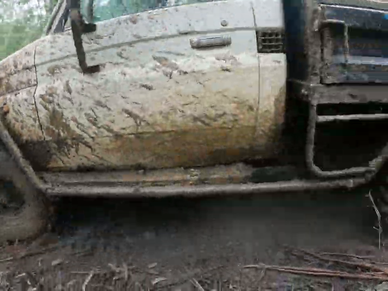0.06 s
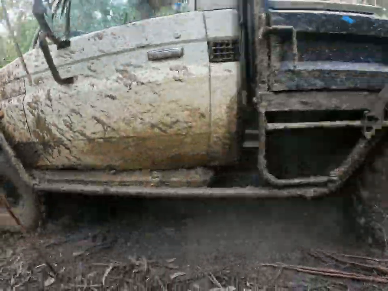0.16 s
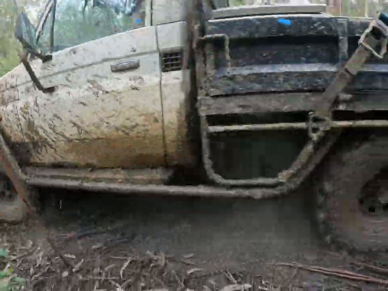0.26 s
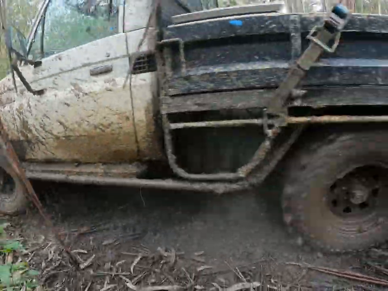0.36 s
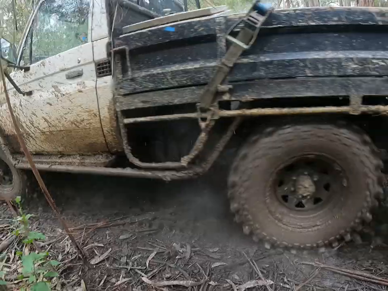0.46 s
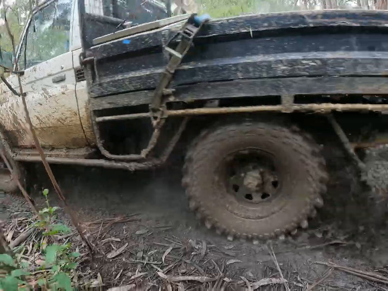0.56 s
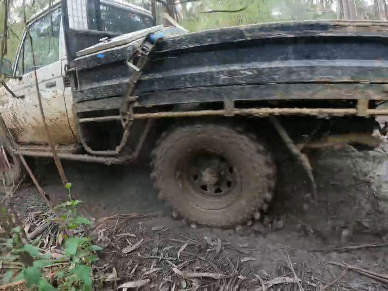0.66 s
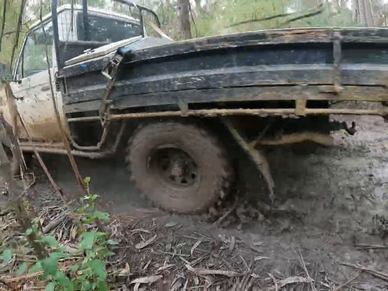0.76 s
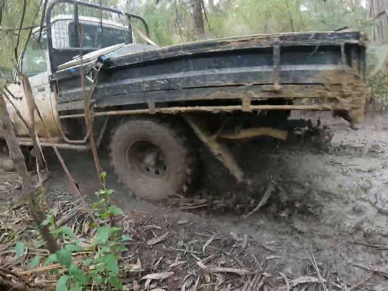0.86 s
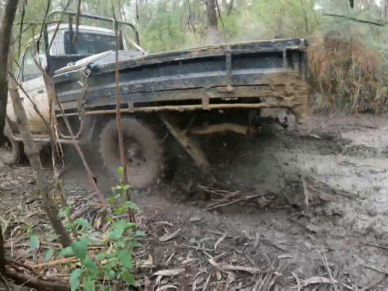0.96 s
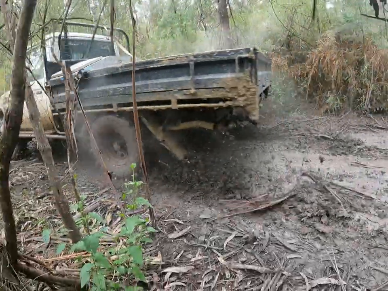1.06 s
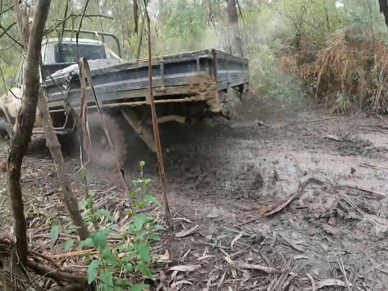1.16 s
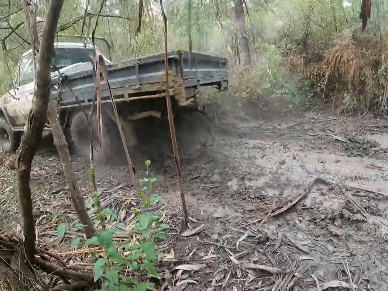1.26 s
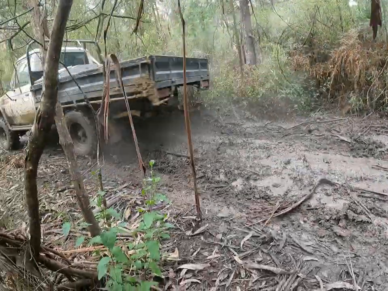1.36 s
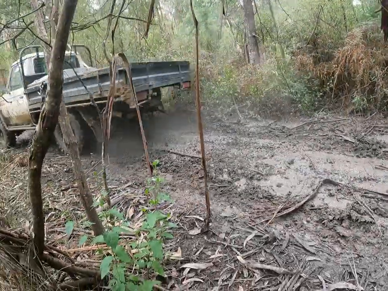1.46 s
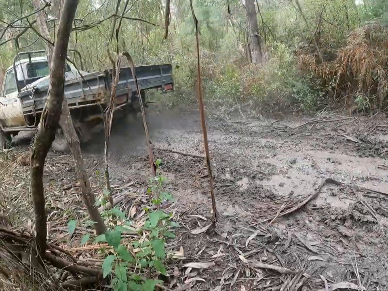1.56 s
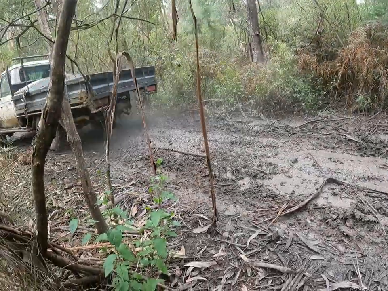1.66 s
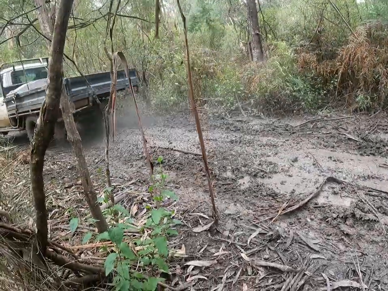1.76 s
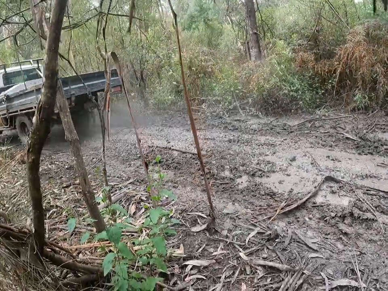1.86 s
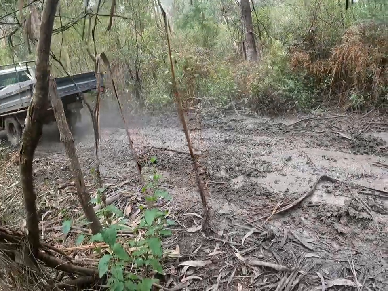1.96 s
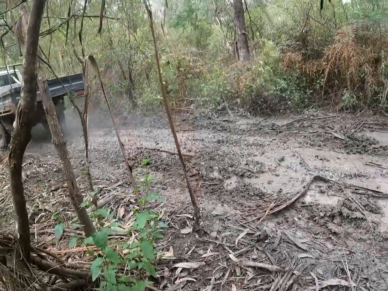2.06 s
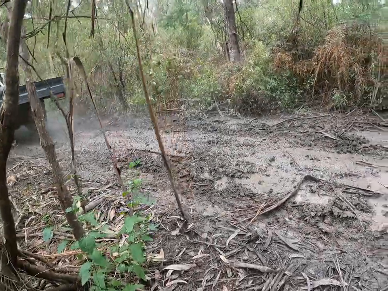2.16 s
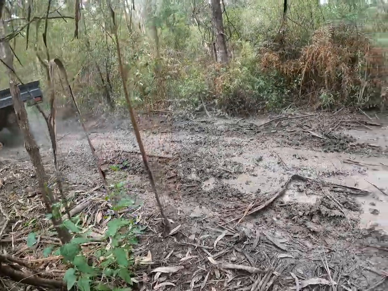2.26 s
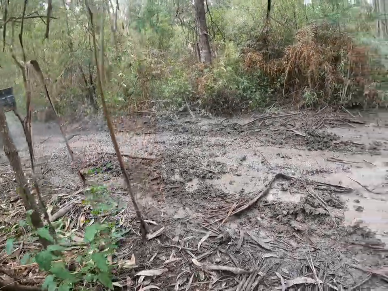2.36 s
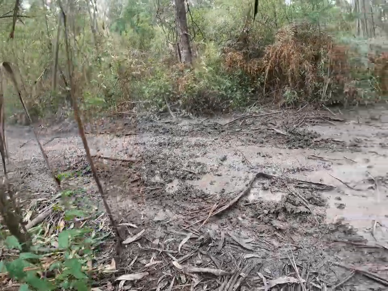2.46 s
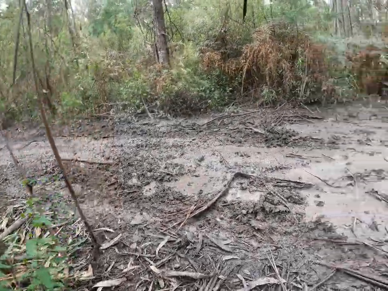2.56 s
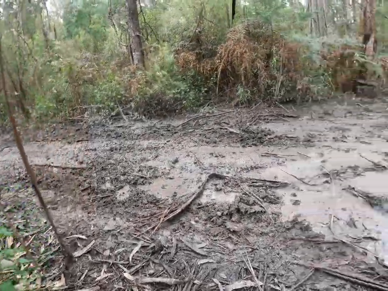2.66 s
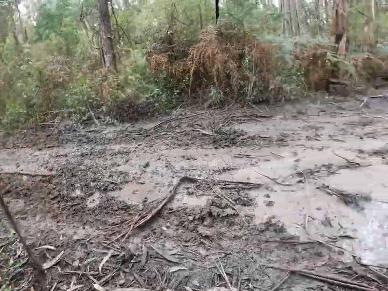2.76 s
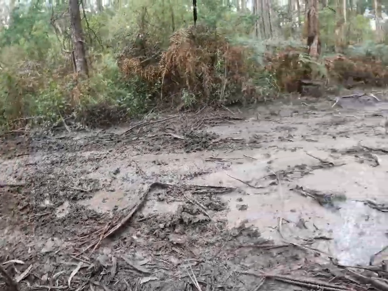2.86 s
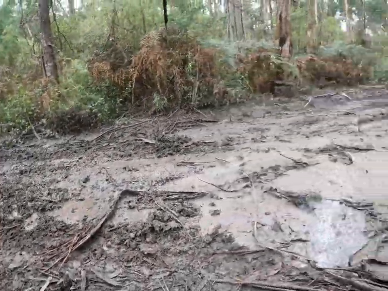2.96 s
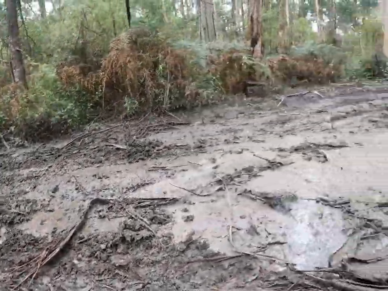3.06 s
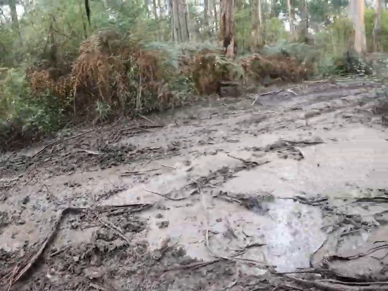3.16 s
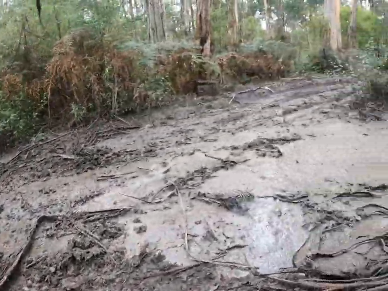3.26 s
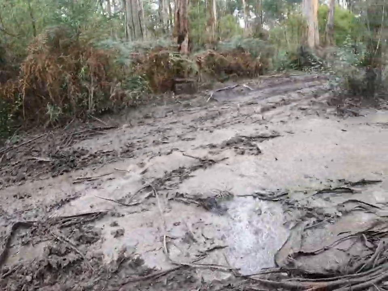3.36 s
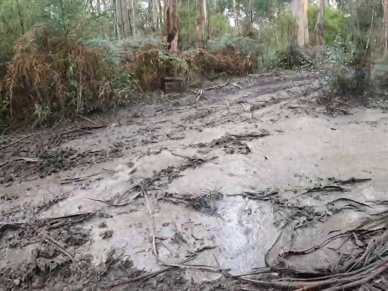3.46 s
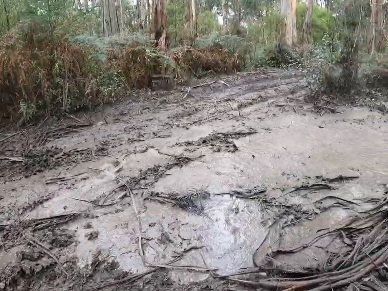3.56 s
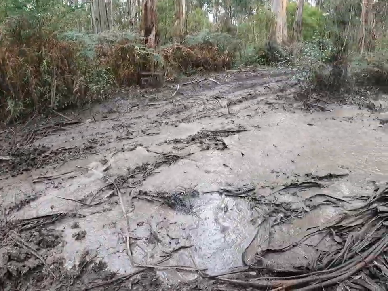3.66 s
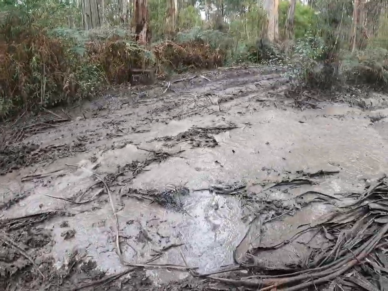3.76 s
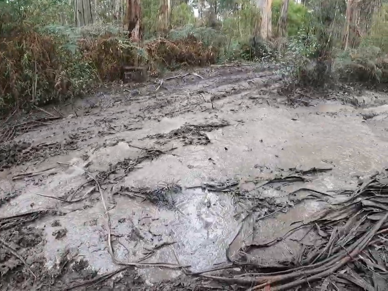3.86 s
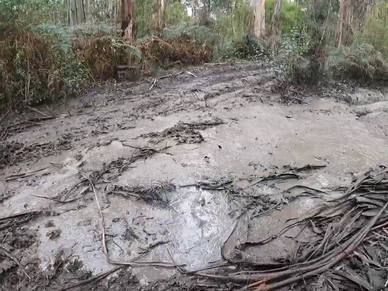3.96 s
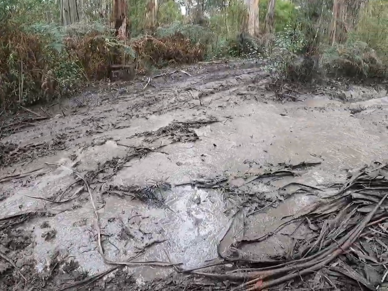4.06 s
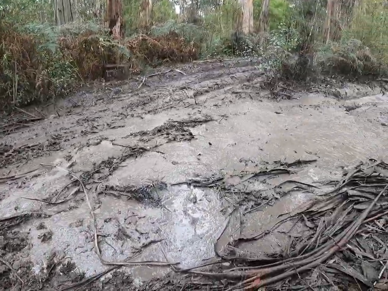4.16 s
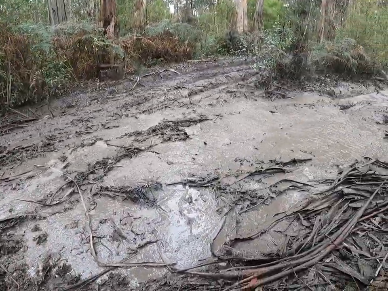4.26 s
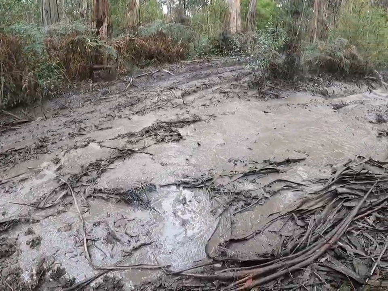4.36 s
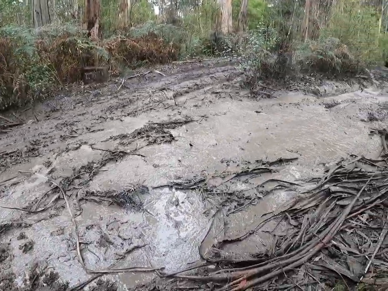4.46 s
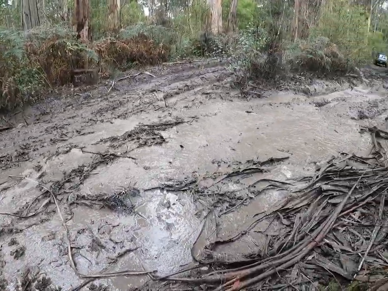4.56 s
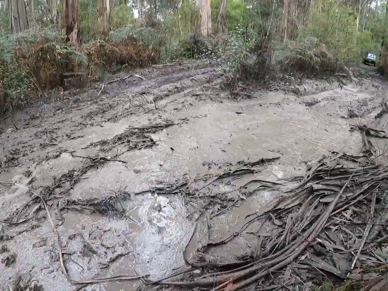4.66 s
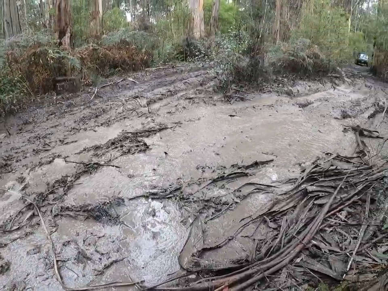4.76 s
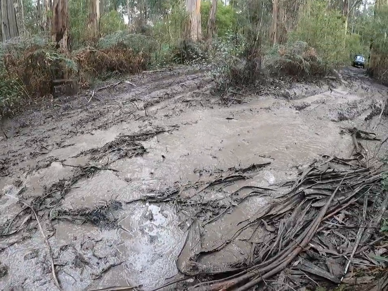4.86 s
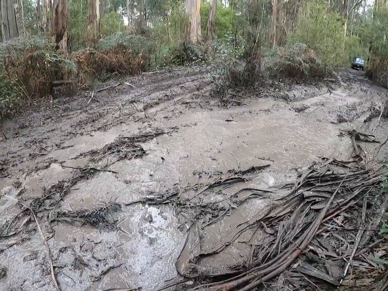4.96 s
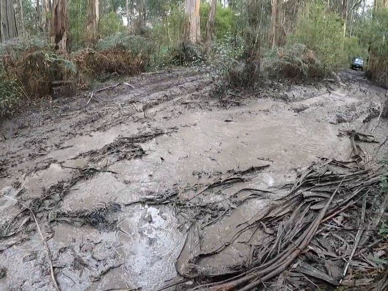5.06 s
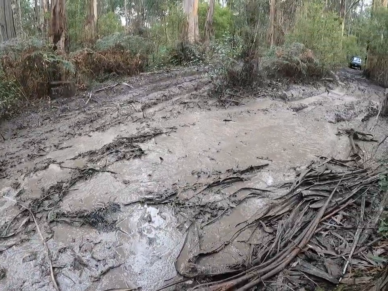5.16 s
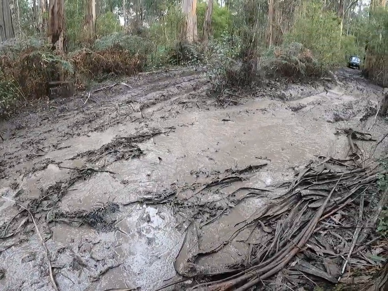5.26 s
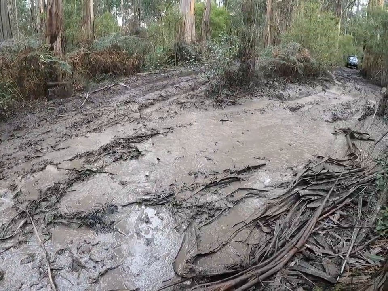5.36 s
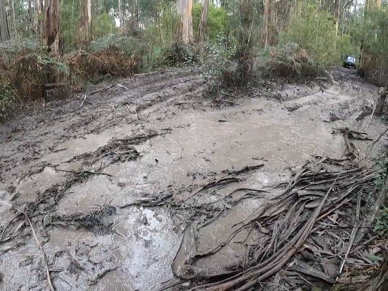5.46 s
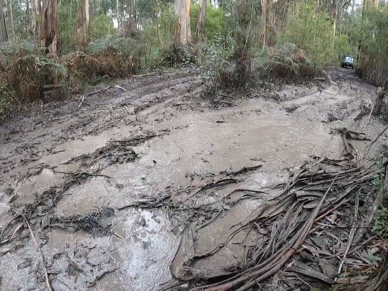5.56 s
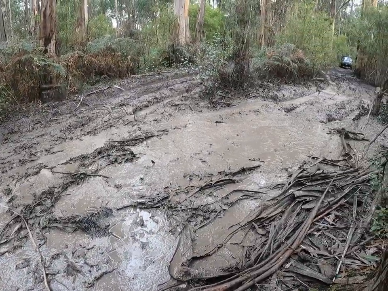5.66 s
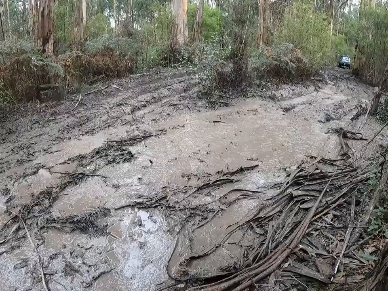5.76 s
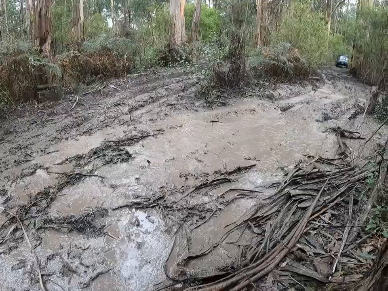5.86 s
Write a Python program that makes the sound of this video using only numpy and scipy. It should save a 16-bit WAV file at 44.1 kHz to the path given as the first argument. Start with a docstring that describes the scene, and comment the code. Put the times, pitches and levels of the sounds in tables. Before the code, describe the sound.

Close diesel engine roar and wet mud spray pass by, then barking throttle stabs recede, leaving twig ticks, rustling and a distant engine.

```python
"""On a muddy forest track, a six-cylinder diesel truck claws past close by and drives off, revving in bursts.
Its exhaust is built from wavering sines; its bark and clatter are firings sent through resonances.
Mud, spray and late rustling are patchy noise; knocks and nearby twig ticks are short dying bursts of noise.
The truck ticks over among echoing trees, while a distant second engine, also sines, slows and pulls away."""
import sys
import numpy as np
from scipy import signal
from scipy.fft import rfft, irfft, next_fast_len
from scipy.io import wavfile
from scipy.ndimage import uniform_filter1d, map_coordinates

SR = 44100
rng = np.random.default_rng(int(sys.argv[2]) if len(sys.argv) > 2 else 0)


def boost_factor(decibels):
    """Convert a level in decibels to a linear amplitude factor."""
    exponent = np.asarray(decibels, float) / 20
    return 10 ** exponent


def file_out(sig):
    """Save sig as 16-bit WAV at sys.argv[1]."""
    # one column per channel
    cols = np.atleast_2d(sig).T
    # limit, then scale
    lim = np.clip(cols, -1, 1)
    pcm = np.round(lim * 32767).astype(np.int16)
    wavfile.write(sys.argv[1], SR, pcm)


N = 259749

# Truck exhaust. Each row: time in seconds, half the firing rate in Hz, firing tone in dB.
TRUCK_EXHAUST = [(0.0, 81.13, -22.5), (0.17, 75.44, -20.5), (0.42, 71.3, -18), (0.6, 66.6, -11.5),
                 (0.84, 74.85, -12), (1.02, 77.14, -12), (1.15, 78.86, -15), (1.2, 75.85, -13.5),
                 (1.31, 69.43, -14.5), (1.55, 60.57, -12.5), (1.64, 56.71, -22.5), (1.74, 52.28, -29),
                 (1.83, 49.7, -31.5), (1.87, 52.94, -20.5), (1.97, 60.6, -15), (2.03, 63.2, -18),
                 (2.17, 59.1, -19.5), (2.28, 65.2, -20), (2.31, 65.9, -29), (2.39, 64.11, -13.5),
                 (2.52, 62.5, -17.5), (2.74, 64.2, -17.5), (2.85, 62.87, -16.5), (3.12, 70.5, -22.5),
                 (3.29, 73.33, -21), (3.39, 70.8, -25), (3.46, 66.27, -12), (3.65, 57.97, -21),
                 (3.8, 53.37, -26), (3.97, 45.94, -40.5), (4.1, 43.64, -51)]
# Tailpipe colour of the burble. Each row: frequency in Hz, relative level in dB.
PIPE_COLOUR = [(20, -29), (60, -25), (130, 5), (180, -16.5), (270, 2.5), (340, -17.5), (700, -23.5),
               (1200, -66)]
# Base noise levels; after about 4 s the last two are rustling near the microphone.
# Each row: time in seconds, engine noise in dB, mud rush in dB, spray in dB.
NOISE_LEVELS = [(0.0, -27.5, -28.5, -36.5), (0.35, -25, -27.5, -38.5), (0.7, -27.5, -29.5, -37),
                (1.0, -30.5, -34, -45), (1.2, -32.5, -37.5, -47.5), (1.42, -33.5, -39, -53.5),
                (1.6, -41, -43.5, -51), (1.85, -47.5, -45, -52.5), (2.1, -42, -44, -56),
                (2.4, -46.5, -46, -57), (2.65, -48.5, -48, -56.5), (2.9, -51, -53, -52.5),
                (3.35, -50.5, -52, -58.5), (3.6, -46.5, -55.5, -72), (4.1, -51, -60.5, -70),
                (4.4, -52.5, -63, -63.5), (4.78, -62, -57.5, -60.5), (5.05, -65.5, -55, -60.5),
                (5.5, -55, -53.5, -60.5), (5.89, -53.5, -53.5, -68)]
# Engine block resonances. Each row: centre in Hz, width in Hz, level in dB before the filter is squared.
BLOCK_MODES = [(1555, 152, 1), (1753, 93, 0), (2330, 810, -9.5)]
# Noise colours: mud, spray, truck body, rumbling ground, forest air. Each row: frequency in Hz,
# relative level in dB per Hz.
MUD_COLOUR = [(1120, -18), (1900, 6), (2140, 1.5), (2560, 4.5), (3730, -1), (4180, -3), (6500, -10),
              (8450, -19), (14300, -120)]
SPRAY_COLOUR = [(3500, -22), (5000, 5), (6300, -2), (7800, -0.5), (9500, -6), (10200, -13.5),
                (13000, -13.5), (15000, -41.5), (16000, -54.5)]
BODY_COLOUR = [(250, -17), (350, -25.5), (450, 4), (550, 3.5), (680, 4.5), (800, 0.5), (950, -6),
               (1400, -40)]
GROUND_COLOUR = [(20, 13), (50, 26.5), (130, 30.5), (180, 3.5), (250, -19), (380, 17), (500, -37)]
AIR_COLOUR = [(100, -23.5), (170, 1), (368, 2.5), (687, -14.5), (741, -15.5), (964, -7), (1830, -13.5),
              (2300, -17.5), (4280, -23), (8440, -36), (15400, -64)]
# Distant engine. Each row: time in seconds, half the firing rate in Hz, tone at that rate in dB,
# firing tone in dB.
FAR_ENGINE = [(3.9, 73.6, -40.5, -49), (4.08, 67.5, -40, -30), (4.16, 68.5, -48, -50),
              (4.25, 74.3, -38, -42), (4.364, 69.97, -48, -34), (4.47, 66, -51, -30),
              (4.614, 55.16, -45, -38.5), (4.8, 63.6, -44, -43), (4.914, 64.4, -41, -38),
              (5.064, 65.1, -48, -49), (5.2, 57.04, -43, -40.5), (5.41, 52.6, -49, -45.5),
              (5.468, 41.96, -32, -31), (5.49, 44.1, -21.5, -27), (5.57, 55.4, -24.5, -23),
              (5.63, 62.76, -23, -24), (5.89, 64.5, -22.5, -23.5)]
# Its weaker tones. Each row: multiple of half the firing rate, level against the firing tone in dB.
FAR_WEAK_TONES = [(.5, -16), (1.5, -7), (2.5, -15), (4, -19), (5.5, -25), (7.5, -28)]
# Its third tone, by that tone's pitch. Each row: pitch in Hz, level over the firing tone in dB.
FAR_THIRD_TONE = [(120, -13), (145, 4), (170, -21), (200, -27)]
# Twig ticks near the microphone. Each row: start in seconds, bright peak in dB, centre in Hz,
# dull peak in dB, time to fall 60 dB in seconds.
TWIG_TICKS = [(2.80, -31.5, 8400, -47, 0.008), (3.071, -32, 4800, -50, .01),
              (3.107, -32, 7460, -47, 0.0075), (3.1765, -21, 4192, -33.5, 0.0071),
              (3.2295, -28.5, 6000, -55, 0.015), (3.254, -26, 6130, -53, .01),
              (3.262, -20, 5360, -27.5, 0.013), (3.3325, -23.5, 6936, -33, 0.011),
              (3.348, -31, 6500, -50, .014), (3.472, -36.5, 6500, -34, .009), (3.51, -35, 4998, -43, .01),
              (4.04, -42, 2990, -35, 0.045), (4.3642, -15.5, 4360, -26, .012),
              (4.747, -39, 6200, -52, 0.034), (4.9, -46, 2500, -37.5, .04), (5.007, -40, 6002, -49, .03),
              (5.208, -34.5, 2800, -32.5, 0.077), (5.2762, -29, 3140, -49, 0.0052),
              (5.314, -28, 4180, -28.5, 0.0071), (5.6, -38.5, 7000, -56, .01),
              (5.63, -39, 7000, -53, 0.012)]
# How alike the two sides are. Each row: frequency in Hz, likeness from 0 to 1.
LIKENESS = [(60, .999), (250, .99), (600, .95), (2000, .92), (5000, .92), (8000, .72), (11000, .2)]
# Balance of the two ports. Each row: frequency in Hz, left over right in dB.
BALANCE = [(60, .8), (150, 0.31), (400, 0.1), (5000, 0.1), (8000, 0.48), (12000, 1.8)]
# Timing of the two ports. Each row: frequency in Hz, lead of the left in radians.
LEFT_LEAD = [(60, -.03), (120, -.12), (230, -.3), (500, -.45), (750, -.55), (1050, -.45), (1500, -.18),
             (3000, -.15), (10000, -.05)]
# Direction above the bass as the truck leaves. Each row: time in seconds, left over right in dB,
# extra echo share from 0 to 1.
DIRECTION = [(0.0, -0.4, 0), (1.26, -1.5, 0), (2.12, 2.5, 0), (3.74, 8, 0.32), (4.76, 1.5, 0.37),
             (5.89, 6.5, 0.39)]
# Echo among the trees. Each row: frequency in Hz, time to fall 60 dB in seconds.
TREE_ECHO = [(100, 1), (1000, 1), (8000, 0.89)]
# Truck ticking over among the trees. Each row: time in seconds, half the firing rate in Hz, tone level in dB.
IDLING = [(4.1, 42.6, -46), (4.32, 37.16, -46), (4.6, 36.74, -59), (4.78, 37.25, -59), (5.08, 36.3, -35),
          (5.42, 35.4, -54)]
# Upper exhaust tones. Each row: frequency in Hz, level over the body noise in dB, before BOOM_AND_GROWL.
GROWL_COLOUR = [(330, -16), (450, -19), (540, -12), (650, -8), (750, -12), (850, -14.5), (1000, -11.5),
                (1300, -16)]
# Driveline whine. Each row: time in seconds, pitch in Hz, level in dB.
DRIVELINE = [(0.0, 296.2, -17.5), (0.2, 304.4, -25), (0.37, 296, -32), (0.5, 310, -28)]
# The bark's resonance, sliding with load and angle. Each row: time in seconds, centre in Hz.
BARK_SLIDE = [(0.25, 1020), (0.44, 1237), (1.11, 1132), (1.25, 974), (1.9, 996.8), (2.5, 1060),
              (3.03, 1260), (3.3, 1084), (4.1, 1190)]
# Separate knocks: one while alongside, the others as the throttle is pressed. Each row: start in seconds,
# bright peak in dB, centre in Hz, dull peak in dB.
SINGLE_KNOCKS = [(.758, -13, 3221, -17.5), (1.881, -40, 2604, -41), (2.194, -32, 2443, -27.5),
                 (2.4446, -32, 3430, -16.5)]
# Firings: blurred alongside, crispest in the short revs, softer again afterwards. Each row: time in seconds,
# strength of blow over noise.
CRISPNESS = [(0, .25), (.75, .3), (.9, .6), (1.4, .7), (1.8, 1.2), (2.4, 1.2), (2.6, .6), (5.89, .4)]
# The driver's foot. Each row: press in seconds, lift in seconds, how far from 0 to 1.
FOOT = [(-0.1, 1.42, 0.25), (1.869, 1.985, 0.95), (2.183, 2.29, 0.67), (2.337, 2.38, 0.49),
        (2.438, 3.39, 0.76)]
# Intake hiss under a held throttle. Each row: time in seconds, centre in Hz, level over the mud rush in dB.
INTAKE_HISS = [(0.0, 3300, -26), (0.45, 3320, -18), (1.1, 3340, -3), (1.76, 3250, -3), (2.4, 3340, -4),
               (2.67, 3700, 1), (2.95, 3700, -5.5), (3.9, 3300, -10.5), (4.2, 3300, -16)]
# Boom and upper exhaust changes over time; low noise swells again late on. Each row: time in seconds,
# boom change in dB, upper exhaust change in dB.
BOOM_AND_GROWL = [(0.0, -2.5, -2.5), (0.75, -2.5, -0.5), (0.9, 2.5, 7), (1.15, 2.5, 0), (1.3, 0.5, 1.5),
                  (1.55, -2, 3), (1.9, -3.5, 2), (2.4, -1, 2), (2.65, 1, 8), (2.9, 1.5, 8.5), (3.3, 0.5, 5),
                  (3.5, -0.5, -4), (4.4, -4, -3), (4.9, 3.5, -5), (5.89, 5, -6)]

PRESS_S, LIFT_S, SURGE, SURGE_S = 0.012, 0.038, 0.21, 0.058  # ramps; extra push at the press, its fading time
BEHIND_S, TURN_S = 2.1, 0.3  # the tailpipe has swung round to face the microphone, over this long
LEAVES_S, LEAVES_DB_PER_S = 3.29, -14  # from here most exhaust tones fade with distance
# Each tone: coasting dB, dB per Hz of half rate over 65 Hz, dB gained at throttle 1 alongside, and from behind.
HALF_TONE, THIRD_TONE = (-28.5, 0.6362, -9, -5), (-43.5, 0.12, -18, 10)
FOURTH_TONE, BURBLE = (-34.5, 0, 7, 14), (-35.5, 0.31, -19.5, -8.5)
# Each noise: dB over its base level, dB gained at throttle 1.
BARK, CLATTER, RUSH, BOOM = (0.18, 16.8), (-7.5, 10.8), (0.16, 8), (-4, 10.4)
BOOM_HZ, ODD_BEHIND_DB = 694, -6.5  # odd upper tones fade from behind the tailpipe
LOPE_HZ, LOPE_PER_HZ, LOPE_MOST = 62, 0.12, 0.85  # half rate where loping starts; depth per Hz below; limit
# One cylinder knocks once a cycle as the engine bogs down, another more weakly two firings before it.
BOG_S, BOG_DB, BOG_HZ, BOG_DULL_DB, WEAKER_DB = 1.2265, -13, 3300, -14.5, -9
BOG_FADES_DB, LIFTED_DB = -0.11, -10  # fading per turn of the half rate; drop once the foot lifts
KNOCK_T60_S, KNOCK_PAN_DB = 0.026, 1.5
FAR_HISS_HZ, FAR_HISS_DB = 3350, -28.5  # level over its half-rate tone
RUMBLE_DB, RUMBLE_FOLLOWS = -35.5, 0.075  # lowest level; share of the distant engine's swell in dB
FAINT_T60_S, FAINT_DB, FAINT_HZ, TICK_PAN_DB = 0.011, -44, 6500, 4  # faint twigs: typical level, pitch scale
AIR_DB, AIR_FILLED_DB = -45, -0.9  # still forest; what is added, over the base mud rush
LEFT_RIGHT = np.array([[0.5], [-0.5]])


def unit(x):
    """Scaled to rms 1."""
    return x / np.sqrt(np.mean(x ** 2) + 1e-20)


def along(points, hz):
    """Reads a table of frequencies and values along a log frequency axis."""
    f, v = np.transpose(points)
    return np.interp(np.log(hz + 1), np.log(f + 1), v)


def curves(rows):
    """One value per sample for each column after the time."""
    s, *cols = np.transpose(rows)
    return [np.interp(np.arange(N) / SR, s, c) for c in cols]


def between(rows):
    """1 while a table lasts, with short fades just outside it."""
    t = np.arange(N) / SR
    return np.clip(np.minimum(t - rows[0][0], rows[-1][0] - t) / 0.089 + 1, 0, 1)


def wobble(rate):
    """A smooth random curve through so many random points a second."""
    return map_coordinates(rng.standard_normal(int(N * rate / SR) + 4), [np.arange(N) * rate / SR])


def filtered(x, response, size=0):
    """Shapes x by a response to frequency; size mirrored samples keep the ends smooth."""
    wide = np.pad(x, [(0, 0)] * (x.ndim - 1) + [(size, size)], "reflect")
    m = next_fast_len(wide.shape[-1] + 8192)
    return irfft(rfft(wide, m) * response(np.fft.rfftfreq(m, 1 / SR)), m)[..., size:size + x.shape[-1]]


def ringing(modes):
    """Response of parts that ring after a push: centre in Hz, width in Hz, level in dB."""
    return lambda f: sum((-1) ** k * boost_factor(db) * 1j * f * w / (c * c - f * f + 1j * f * w)
                         for k, (c, w, db) in enumerate(modes))


def resonated(x, modes):
    """Sends x through the same resonances twice, for steeper sides."""
    return filtered(x, lambda f: ringing(modes)(f) ** 2)


def sliding(x, hz, width_hz):
    """A moving resonance: fixed ones, close together, cross-faded along hz."""
    step = width_hz / 4
    share = lambda c: np.clip(1 - abs(hz - c) / step, 0, 1)
    centres = np.arange(hz.min(), hz.max() + step, step)
    return unit(sum(share(c) * resonated(x, [(c, width_hz, 0)]) for c in centres))


def rush(spectrum, patchy_db):
    """Coloured noise of rms 1 with random louder and softer patches in time and pitch."""
    z = signal.stft(rng.standard_normal(N), nperseg=512)[2]
    field = uniform_filter1d(uniform_filter1d(rng.standard_normal(z.shape), size=5, axis=0), size=8, axis=1)
    x = signal.istft(z * boost_factor(patchy_db * unit(field)), nperseg=512)[1][:N]
    return unit(filtered(x, lambda hz: boost_factor(along(spectrum, hz))))


def tone(turns, db, waver_db):
    """A sine whose strength wavers around rms level db."""
    return np.sqrt(2) * boost_factor(db + waver_db * wobble(18)) * np.sin(2 * np.pi * (turns + rng.random()))


def snaps(rows, pan_db):
    """Each is a sharp dying burst of noise in one broad band, with a dull part near 1 kHz."""
    out, t = np.zeros((2, N + SR)), np.arange(SR // 16) / SR
    peak = lambda x: x / abs(x).max()
    for s, db, hz, dull_db, t60 in rows:
        burst = boost_factor(-60 * t / max(t60, 0.003)) * rng.standard_normal((2, len(t)))
        band = ringing([(hz, 1.7 * hz, 0)])
        bright = filtered(burst[0], lambda f: band(f) ** 2 / (1 + (f / (1.28 * hz)) ** 4))
        dull = resonated(burst[1], [(1100, 800, 0)])
        sound = boost_factor(db) * peak(bright) + boost_factor(dull_db) * peak(dull)
        start = round(s * SR)
        out[:, start:start + len(t)] += sound * boost_factor(pan_db * LEFT_RIGHT)
    return out[:, :N]


def truck():
    """Shares one engine speed and one throttle among the exhaust, firing noise, body, mud and spray."""
    half_hz = curves(TRUCK_EXHAUST)[0]
    engine_db, mud_db, spray_db = curves(NOISE_LEVELS)
    foot = throttle()
    behind = curves([(BEHIND_S - TURN_S, 0), (BEHIND_S, 1)])[0]
    boom_db, growl_db = curves(BOOM_AND_GROWL)
    body_db = engine_db + BOOM[0] + foot * BOOM[1] + boom_db
    mud_db = mud_db + RUSH[0] + foot * RUSH[1]
    turns = np.cumsum(half_hz) / SR
    # each firing is one blow and a short burst of noise, of its own size
    firing = 2 * turns
    size = boost_factor(0.43 * rng.standard_normal(1200))[firing.astype(int)]
    strikes = np.diff(np.floor(firing), prepend=0) > 0
    blows = unit(size * strikes * between(TRUCK_EXHAUST))
    beat = size * np.exp(-4 * (firing % 1))
    tones = exhaust(turns, half_hz, foot, behind) + growl(turns, half_hz, body_db + growl_db, behind)
    noises = bark_and_clatter(blows, beat, engine_db, foot) + mud_and_spray(beat, mud_db, spray_db)
    return between(TRUCK_EXHAUST) * tones + noises + intake(mud_db) + body(blows, body_db)


def throttle():
    """How far the foot is down: each press ramps in, surges briefly, holds and ramps out."""
    t = np.arange(N) / SR
    ramp = lambda on, off: np.clip(np.minimum((t - on) / PRESS_S, (off - t) / LIFT_S + 1), 0, 1)
    surge = lambda on: 1 + SURGE * np.exp(-abs(t - on) / SURGE_S)
    return sum(far * ramp(on, off) * surge(on) for on, off, far in FOOT)


def exhaust(turns, half_hz, foot, behind):
    """Exhaust pulses make tones at multiples of half the firing rate; unequal cylinders add a burble."""
    firing_db = curves(TRUCK_EXHAUST)[1]
    gone_db = LEAVES_DB_PER_S * np.clip(np.arange(N) / SR - LEAVES_S, 0, None)

    def level(db, per_hz, side, rear):
        pressed_db = foot * (side + (rear - side) * behind)
        return db + gone_db + per_hz * (half_hz - 65) + pressed_db

    # when slow and coasting, the firing tone lopes once a cycle
    depth = np.clip(LOPE_PER_HZ * (LOPE_HZ - half_hz) * (1 - 2 * foot), 0, LOPE_MOST)
    lope = 1 + depth * np.sin(2 * np.pi * turns / 3)
    hum = lope * tone(2 * turns, firing_db, waver_db=1.14)
    hum += tone(turns, level(*HALF_TONE), waver_db=5.0)
    hum += tone(3 * turns, level(*THIRD_TONE), waver_db=1.8)
    hum += tone(4 * turns, level(*FOURTH_TONE), waver_db=1.8)
    # the burble sits on multiples of the whole engine cycle, a third of the half rate
    burble_db = level(*BURBLE)
    burble = sum(tone(k * turns / 3, burble_db + along(PIPE_COLOUR, k * half_hz / 3), waver_db=2.5)
                 for k in range(1, 20) if k % 3)
    return hum + burble


def growl(turns, half_hz, db, behind):
    """Upper exhaust tones, at higher multiples of half the firing rate, swell with the throttle."""
    odd_db = ODD_BEHIND_DB * behind
    return sum(tone(k * turns, db + along(GROWL_COLOUR, k * half_hz) + odd_db * (k % 2), waver_db=1.6)
               for k in range(5, 19))


def bark_and_clatter(blows, beat, engine_db, foot):
    """Firing blows and noise excite a sliding resonance, the bark, and the engine block, the clatter."""
    drive = lambda: curves(CRISPNESS)[0] * blows + unit((0.2 + beat) * rng.standard_normal(N))
    bark_db, clatter_db = (engine_db + db + foot * gain for db, gain in (BARK, CLATTER))
    bark_hz = curves(BARK_SLIDE)[0]
    bark = boost_factor(bark_db + 0.78 * wobble(21)) * sliding(drive(), bark_hz, width_hz=338)
    clatter = boost_factor(clatter_db + 3.5 * wobble(11)) * unit(resonated(drive(), BLOCK_MODES))
    return bark + clatter


def body(blows, body_db):
    """Patchy low noise, with the tray and pipe booming at one wandering resonance."""
    noise = boost_factor(body_db + 1.0 + 0.71 * wobble(8.4)) * rush(BODY_COLOUR, patchy_db=2.5)
    push = blows + rng.standard_normal(N)
    return noise + boost_factor(body_db + 1.5) * sliding(push, BOOM_HZ + 30 * wobble(5), width_hz=246)


def intake(mud_db):
    """Air drawn into the engine hisses in one sliding band."""
    hz, db = curves(INTAKE_HISS)
    return boost_factor(mud_db + db) * sliding(rng.standard_normal(N), hz, width_hz=890)


def mud_and_spray(beat, mud_db, spray_db):
    """Patchy noise for mud and spray flung by tyres, then for rustling; the mud pulses with the firings."""
    lumps = 1.1 * wobble(17)  # uneven handfuls
    mud = boost_factor(mud_db + lumps) * unit((3.8 + beat) * rush(MUD_COLOUR, patchy_db=2.0))
    spray = boost_factor(spray_db - 1 + lumps + 0.61 * wobble(15)) * rush(SPRAY_COLOUR, patchy_db=3.5)
    return mud + spray


def knocks():
    """Separate knocks, and seven engine cycles of knocking that weaken, most of all once the foot lifts."""
    turns = np.cumsum(curves(TRUCK_EXHAUST)[0]) / SR
    at = lambda turn: np.interp(turns[round(BOG_S * SR)] + turn, turns, np.arange(N) / SR)
    bog = []
    for k in range(19):  # turns of the half rate, three to a cycle
        strong, weak = k % 3 == 0, k % 3 == 2 and k < 14
        if strong or weak:
            fall = BOG_FADES_DB * k + LIFTED_DB * (at(k) > FOOT[0][1]) + WEAKER_DB * weak
            dull_fall = fall - WEAKER_DB / 2 * weak  # a weak knock's dull part drops by only half WEAKER_DB
            bog.append((at(k), BOG_DB + fall, BOG_HZ, BOG_DULL_DB + dull_fall))
    return snaps([(*row, KNOCK_T60_S) for row in list(SINGLE_KNOCKS) + bog], KNOCK_PAN_DB)


def whine():
    """A short driveline whine while the truck is alongside: one sine sliding in pitch."""
    hz, db = curves(DRIVELINE)
    return between(DRIVELINE) * tone(np.cumsum(hz) / SR, db, waver_db=0.5)


def idle():
    """The truck ticking over far off: sines at half the firing rate and at the firing rate."""
    half_hz, db = curves(IDLING)
    turns = np.cumsum(half_hz) / SR
    return between(IDLING) * sum(tone(k * turns, db, waver_db=2) for k in (1, 2))


def twigs():
    """Clear ticks, and a scatter of faint ones once the truck has gone by."""
    faint = [(2.3 + 3.4 * when, FAINT_DB + 8 * (loud - 0.5), FAINT_HZ * (0.33 + 0.8 * pitch),
              FAINT_DB - 18, FAINT_T60_S) for when, loud, pitch in rng.random((12, 3))]
    return snaps(list(TWIG_TICKS) + faint, TICK_PAN_DB)


def far_engine():
    """A distant exhaust: two strong tones, weaker ones, intake hiss and low rumble along the ground."""
    half_hz, half_db, firing_db = curves(FAR_ENGINE)
    turns = np.cumsum(half_hz) / SR
    hum = tone(turns, half_db, waver_db=1.5) + tone(2 * turns, firing_db, waver_db=1.5)
    hum += tone(3 * turns, firing_db + along(FAR_THIRD_TONE, 3 * half_hz), waver_db=2.3)
    hum += sum(tone(k * turns, firing_db + db, waver_db=2.5) for k, db in FAR_WEAK_TONES)
    hiss = unit(resonated(rng.standard_normal(N), [(FAR_HISS_HZ, 1000, 0)]))
    hiss = boost_factor(half_db + FAR_HISS_DB) * hiss
    rumble_db = RUMBLE_DB + RUMBLE_FOLLOWS * (half_db - half_db.min())
    return between(FAR_ENGINE) * (hum + hiss) + boost_factor(rumble_db) * rush(GROUND_COLOUR, patchy_db=1.5)


def trees(x):
    """Half a second of scattered echo, different at each side; each frequency dies at its own speed."""
    hz, t, z = signal.stft(rng.standard_normal((2, SR // 2)), SR, nperseg=256)
    fade = boost_factor(-60 * t / along(TREE_ECHO, hz)[:, None])
    tail = signal.istft(z * fade, SR, nperseg=256)[1]
    return signal.fftconvolve(x[None], tail / np.linalg.norm(tail[0]), axes=1)[:, :N]


def air():
    """Broad low murmur of the forest, filled by the truck while it is near."""
    level = boost_factor(AIR_DB) + boost_factor(curves(NOISE_LEVELS)[1] + AIR_FILLED_DB)
    return level * rush(AIR_COLOUR, patchy_db=3.0)


def scene():
    """Direct sound is alike at both sides; the scattered share grows with pitch and, above the bass, over time."""
    engines = truck() + whine() + idle() + far_engine() + air()
    echo = trees(engines)
    direct = filtered(engines, lambda hz: np.sqrt(along(LIKENESS, hz)), size=2048)
    near = direct + filtered(echo, lambda hz: np.sqrt(1 - along(LIKENESS, hz)))
    # only the sound above the bass is aimed left or right
    upper = lambda x: filtered(x, lambda hz: 1 / (1 + (400 / (hz + 1)) ** 3), size=2048)
    pan_db, far = curves(DIRECTION)
    upper_near = upper(near)
    aimed = boost_factor(pan_db * LEFT_RIGHT) * (np.sqrt(1 - far) * upper_near + np.sqrt(far) * upper(echo))
    return near - upper_near + aimed + knocks() + twigs()


def band_limit(x):
    """A steep low-pass at the top of the band."""
    return signal.sosfilt(signal.butter(12, 15590, fs=SR, output="sos"), x)


def record(dry):
    """Two microphone ports of slightly different colour and phase."""
    colour = lambda hz: boost_factor(along(BALANCE, hz) * LEFT_RIGHT)
    phase = lambda hz: np.exp(1j * along(LEFT_LEAD, hz) * LEFT_RIGHT)
    mix = filtered(dry, lambda hz: colour(hz) * phase(hz), size=2048)
    return band_limit(mix)


dry = scene()
out = record(dry)
file_out(out)
```